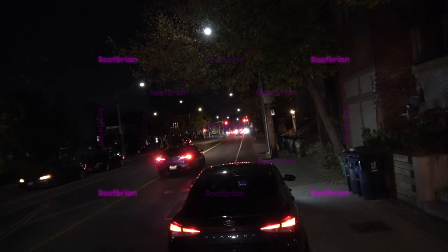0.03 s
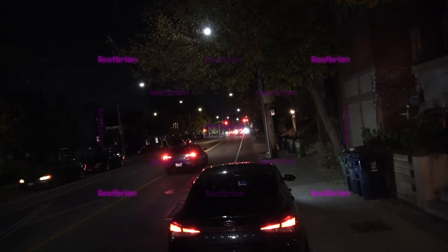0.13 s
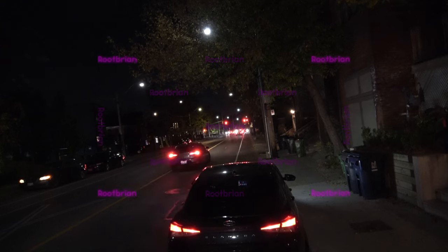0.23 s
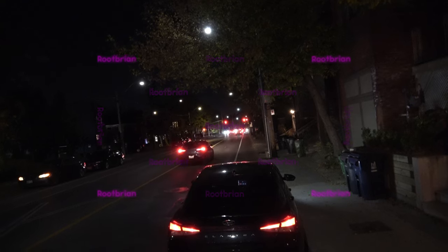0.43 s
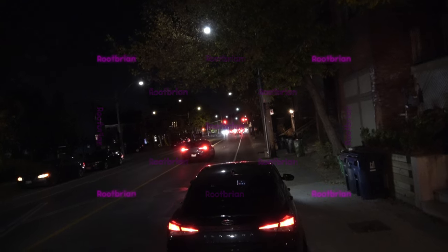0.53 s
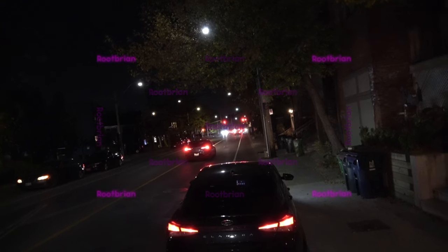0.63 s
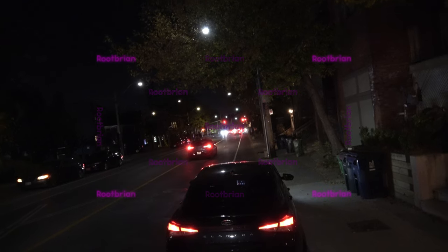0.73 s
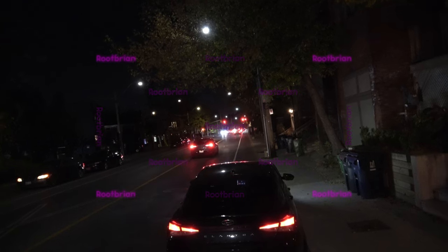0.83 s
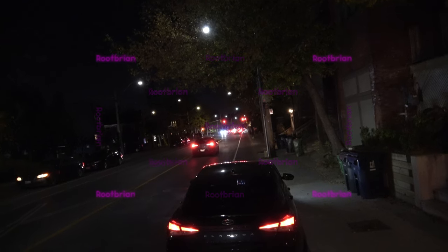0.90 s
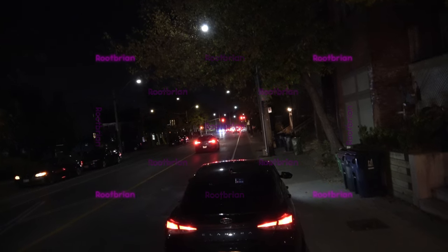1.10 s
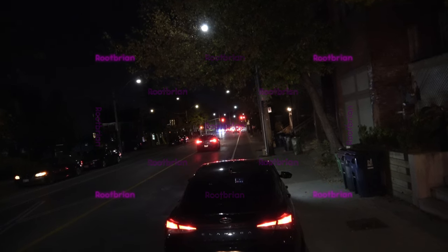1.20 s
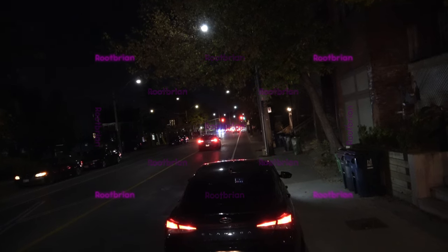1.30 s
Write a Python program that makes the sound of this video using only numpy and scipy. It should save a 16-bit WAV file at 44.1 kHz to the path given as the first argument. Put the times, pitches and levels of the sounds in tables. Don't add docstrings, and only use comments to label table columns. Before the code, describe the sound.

A loud air horn gives two short blasts, the second longer, after a brief hiss and stutter. House fronts echo brightly while a car pulls away over low rumble and an idling engine; the microphone ducks.

```python
import sys
import numpy as np
from scipy import signal
from scipy.fft import rfft, irfft, next_fast_len
from scipy.io import wavfile
from scipy.ndimage import uniform_filter1d, minimum_filter1d, map_coordinates

SR = 44100
rng = np.random.default_rng(int(sys.argv[2]) if len(sys.argv) > 2 else 0)


def file_out(sig):
    cols = np.atleast_2d(sig).T
    lim = np.clip(cols, -1, 1)
    pcm = np.round(lim * 32767).astype(np.int16)
    wavfile.write(sys.argv[1], SR, pcm)


def field_ratio(decibels):
    return 10 ** (np.asarray(decibels, dtype=float) / 20)


N = 59535
TIME = np.arange(N) / SR
LEFT_RIGHT = np.array([[.5], [-.5]])


def unit(x):
    return x / np.sqrt(np.mean(x ** 2) + 1e-20)


def along(points, hz):
    f, value = np.transpose(points)
    return np.interp(np.log(hz + 1), np.log(f + 1), value)


def wobble(rate):
    knots = rng.standard_normal(int(N * rate / SR) + 4)
    return map_coordinates(knots, [TIME * rate])


def filtered(x, response):
    m = next_fast_len(N + SR)
    return irfft(rfft(x, m) * response(np.fft.rfftfreq(m, 1 / SR)), m)[..., :N]


def rush(spectrum, apart):
    common, *sides = rng.standard_normal((3, N))
    return unit(filtered(common + apart * np.array(sides), lambda hz: field_ratio(along(spectrum, hz))))


def rise(t, length):
    return np.sin(np.pi / 2 * np.clip(t / length, 0, 1)) ** 2


# frequency in Hz, level in dB per Hz.
CAR_TONE = [(18, -29), (30, -5), (270, -0.5), (575, -9.5), (656, -5), (830, -6), (1360, -1.5), (1870, -12),
            (15500, -53.5)]
# frequency in Hz, level in dB per Hz.
RUMBLE_TONE = [(18, -29.5), (30, 9), (64, -4), (237, -8.5), (369, -7), (830, -15.5), (921, -8.5),
               (1400, -10.5), (15500, -54)]
# frequency in Hz, rms level in dB.
IDLE_HUMS = [(65.5, -54), (131, -44), (196, -53.5), (262, -47.5), (385, -74.5)]
# frequency in Hz, left over right in dB.
TRAFFIC_SIDES = [(30, -7.5), (60, 0), (110, 10.5), (200, 7), (380, -0.5), (700, -4), (1290, 1.5), (2380, 0),
                 (8000, 3)]
CAR_DB, CAR_FADE_DB_PER_S, RUMBLE_DB = -26, -20, -35.5
MIC_LOW_HZ = 45


def traffic():
    car_db = CAR_DB + CAR_FADE_DB_PER_S * np.maximum(TIME - .15, 0) + wobble(40)
    car = field_ratio(car_db) * rush(CAR_TONE, 0.17)
    rumble = field_ratio(RUMBLE_DB + 0.73 * wobble(12.24)) * rush(RUMBLE_TONE, 0.05)
    idle = np.zeros(N)
    for hz, db in IDLE_HUMS:
        hum = np.sin(2 * np.pi * hz * TIME + wobble(20))
        idle += np.sqrt(2) * field_ratio(db + 1.2 * wobble(14)) * hum

    def microphone(f):
        low_cut = 1 + (MIC_LOW_HZ / (f + 1)) ** 2
        return field_ratio(LEFT_RIGHT * along(TRAFFIC_SIDES, f)) / low_cut
    return filtered(car + rumble + idle, microphone)


# frequency in Hz, level in dB.
FORWARD_BEAM = [(652, -12), (1305, 20.8), (1957, 27.8), (2610, 29), (3262, 30), (5200, 37), (8000, 38),
                (15000, 36)]
# delay in seconds, level in dB, left over right in dB, share of the forward beam from 0 to 1.
ECHOES = [(0.0083, -11.9, -0.7, 0.41), (0.02054, -11.7, 0.2, 0.4), (0.03426, -8.0, -7.0, 0.01),
          (0.04825, -32.0, 0.2, 1.0), (0.06167, -16.2, -0.2, 0.22), (0.07983, -14.3, -6.5, 0.39),
          (0.10037, -29.7, -4.0, 1.0), (0.11993, -20.4, -2.7, 0.35), (0.13997, -23.1, -8.3, 0.46),
          (0.15703, -16.7, -2.0, 0.03), (0.18526, -32.7, -16.0, 0.65), (0.2149, -33.0, -5.9, 1.0),
          (0.24956, -30.4, -16.0, 0.57), (0.28966, -28.1, -8.9, 0.7), (0.32451, -31.5, 8.0, 0.19),
          (0.36568, -29.4, -15.4, 0.1), (0.40928, -45.0, -1.1, 0.94), (0.46955, -34.2, -4.8, 0.06),
          (0.53955, -55.5, 3.8, 1.0), (0.61062, -36.8, -1.2, 0.24)]
# frequency in Hz, change in dB per second of travel.
AIR_LOSS = [(1400, -6), (2000, -17.5), (2600, -11.5), (3300, 3), (5000, -39.5), (9000, -86.5),
            (15000, -120)]
# frequency in Hz, time to fall 60 dB in seconds.
STREET_RING = [(600, 3), (2500, 2.3), (6000, .55), (14000, 0.9)]
LEDGES, LEDGE_SPREAD_S, LEDGE_HZ = 7, .03, 3700
STREET_DB, STREET_GAP_S, STREET_BEAM = -39, 0.02, 0.86


def street(x):
    def delayed(f, s):
        return np.exp(-2j * np.pi * f * s)

    def walls(f):
        rough = 1 / (1 + (LEDGE_HZ / (f + 1)) ** 10)
        total = 1
        for s, db, pan_db, beam in ECHOES:
            ledge_s = LEDGE_SPREAD_S * rng.random((LEDGES, 1))
            scatter = delayed(f, ledge_s).sum(0) / np.sqrt(LEDGES)
            echo_db = db + beam * along(FORWARD_BEAM, f) + s * along(AIR_LOSS, f)
            echo = field_ratio(echo_db + LEFT_RIGHT * pan_db) * delayed(f, s)
            total = total + echo * (1 - rough + rough * scatter)
        return total

    hz, t, z = signal.stft(rng.standard_normal((2, SR)), SR, nperseg=256)
    decay = field_ratio(-60 * t / along(STREET_RING, hz)[:, None])
    tail = signal.istft(z * decay, SR, nperseg=256)[1]
    tail = tail / np.linalg.norm(tail[0])
    late = filtered(x, lambda f: field_ratio(STREET_BEAM * along(FORWARD_BEAM, f)) * delayed(f, STREET_GAP_S))
    return filtered(x, walls) + field_ratio(STREET_DB) * signal.fftconvolve(late[None], tail, axes=1)[:, :N]


# frequency in Hz, level in dB per Hz.
HISS_TONE = [(3000, -22.5), (6000, -1.5), (8200, -5.5), (10500, -6.5), (11500, -30), (13500, -0.5),
             (15500, -26.5)]
HISS_S, HISS_RISE_S, HISS_END_S, HISS_DB = .163, .035, .216, -45


def valve():
    shape = rise(TIME - HISS_S, HISS_RISE_S) * (1 - rise(TIME - HISS_END_S, .004))
    return field_ratio(HISS_DB + 1.6 * wobble(150)) * shape * rush(HISS_TONE, 0.76)


# start in seconds, length in seconds, level in dB.
HORN_BLASTS = [
    (.212, .008, -12),
    (.221, .078, 0),
    (.453, .128, 0),
]
# multiple of the pitch, level in dB.
BELL_OVERTONES = [(1, 1.1), (2, -2.7), (3, -18.8), (4, -18.4), (5, -26.1), (6, -33), (7, -37), (8, -37),
                  (9, -40), (10, -45), (11, -48), (12, -49), (13, -53), (14, -52), (15, -58), (16, -58),
                  (17, -59), (18, -58), (19, -56), (20, -59), (21, -63), (22, -68)]
PITCH_HZ, START_SHARP, SETTLE_S, SAG = 652.5, .025, .006, .035
ATTACK_S, BLOOM_PER_ORDER_S, RELEASE_S = .005, .002, .02
RASP_DB, RASP_END_DB = -44, -19


def horn():
    out = np.zeros(N)
    order, level_db = np.transpose(BELL_OVERTONES)[..., None]
    for start, length, db in HORN_BLASTS:
        t = TIME - start
        shut = rise(t - length, RELEASE_S)
        hz = PITCH_HZ * (1 + START_SHARP * np.exp(-np.abs(t) / SETTLE_S) - SAG * shut)
        phase = 2 * np.pi * np.cumsum(hz * (t > 0)) / SR
        speak = rise(t, ATTACK_S + BLOOM_PER_ORDER_S * order)
        closing = rise(t - length + RELEASE_S, RELEASE_S)
        rasp = field_ratio(RASP_DB + (RASP_END_DB - RASP_DB) * closing)
        breath = rng.standard_normal((len(order), N))
        breath = unit(filtered(breath, lambda f: np.exp(-(f / 300) ** 2)))
        flutter = 1 + rasp * np.sqrt(order) * breath
        overtones = field_ratio(level_db) * speak * flutter * np.cos(order * phase)
        out += field_ratio(db) * (1 - shut) * overtones.sum(0)
    return out


def scene():
    return traffic() + valve() + street(horn())


def steer(x):
    z = signal.stft(x, nperseg=512, noverlap=384)[2]
    shared = np.abs(z) * np.exp(1j * np.angle(z.sum(0)))
    return signal.istft(shared, nperseg=512, noverlap=384)[1][:, :N]


# time in seconds, gain in dB.
CAMERA_GAIN = [(0, 0.5), (0.215, 2), (0.235, -10.5), (0.26, -8), (0.3, -13.5), (0.34, -5), (0.39, -2.5),
               (0.45, -1), (0.47, -12), (0.55, -14.5), (0.585, -9.5), (0.63, -5.5), (0.7, -4.5),
               (0.8, -4.5), (1.35, -1)]
# time in seconds, gain in dB.
GAIN_SLIPS = [(.229, 4), (.2335, 1.5), (.243, 2.3), (.25, 1.3), (.267, 0.2), (.284, .6), (.298, -2.2),
              (.506, 0.8), (.515, 1.7), (.533, 1.5), (0.552, 1.2), (0.566, .7)]
SLIP_S, CEILING, HOLD_S = .0007, .74, .006


def duck(x):
    ducked = x * field_ratio(np.interp(TIME, *np.transpose(CAMERA_GAIN)))
    hold = round(HOLD_S * SR)
    need = np.minimum(1, CEILING / (np.abs(ducked).max(0) + 1e-9))
    limit = uniform_filter1d(minimum_filter1d(need, size=hold), size=hold)
    slips_db = sum(db * np.exp(-((TIME - s) / SLIP_S) ** 2) for s, db in GAIN_SLIPS)
    return ducked * limit * field_ratio(slips_db)


def low_pass(x):
    return signal.sosfilt(signal.butter(12, 15680, fs=SR, output="sos"), x)


def record(dry):
    return low_pass(duck(steer(dry)))


dry = scene()
out = record(dry)
file_out(out)
```